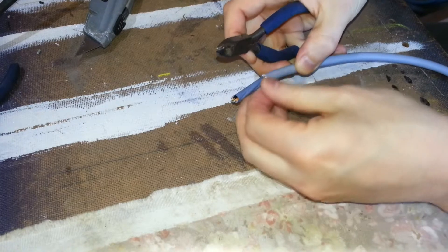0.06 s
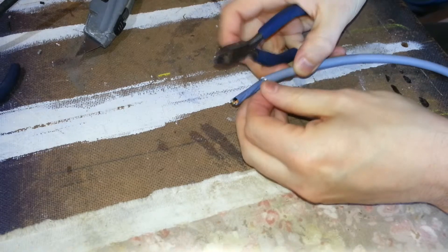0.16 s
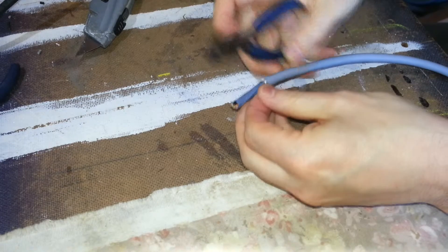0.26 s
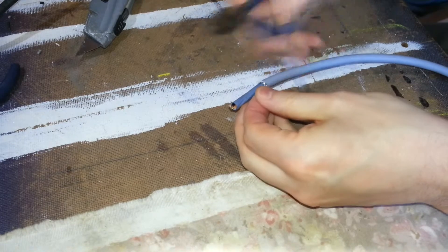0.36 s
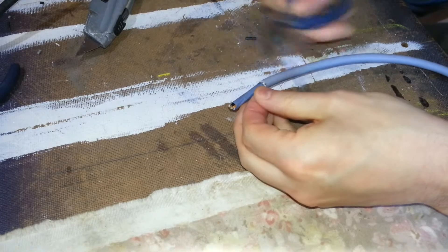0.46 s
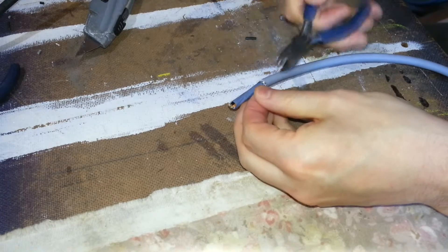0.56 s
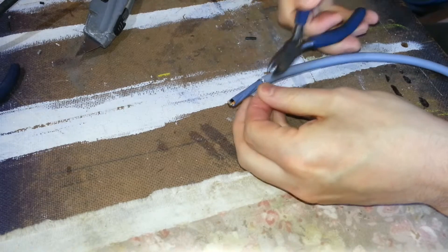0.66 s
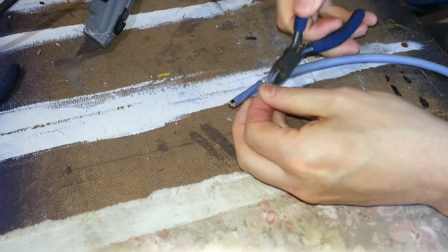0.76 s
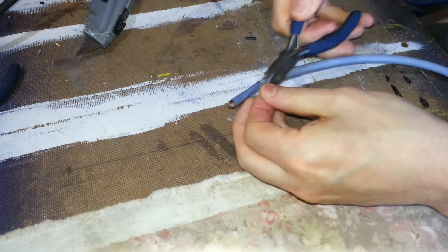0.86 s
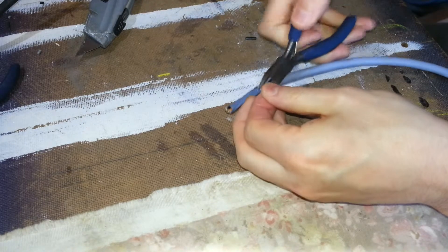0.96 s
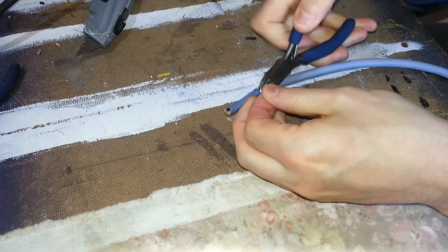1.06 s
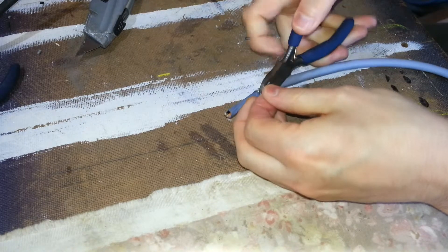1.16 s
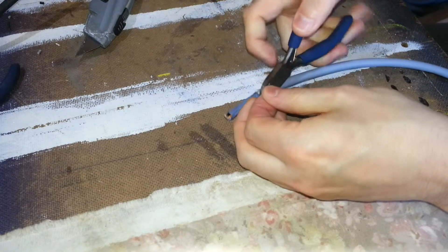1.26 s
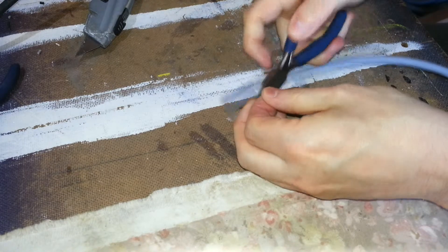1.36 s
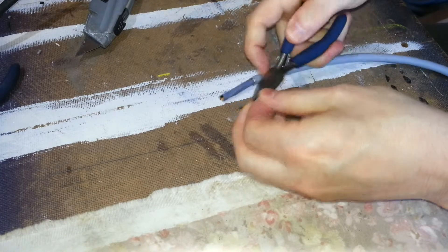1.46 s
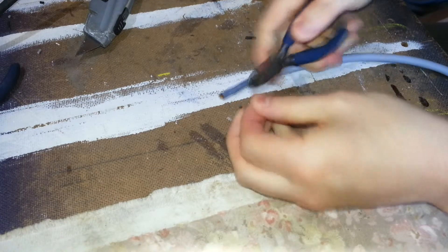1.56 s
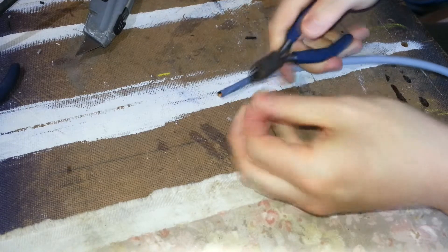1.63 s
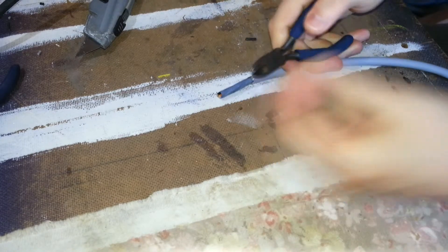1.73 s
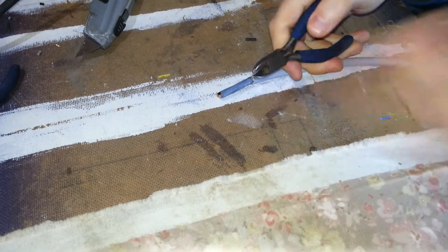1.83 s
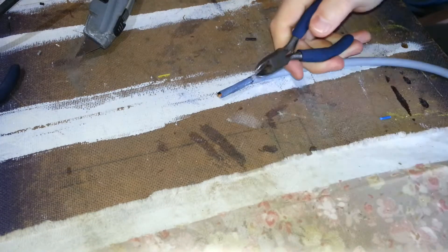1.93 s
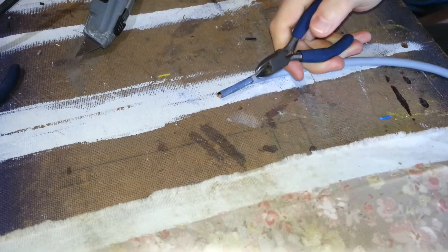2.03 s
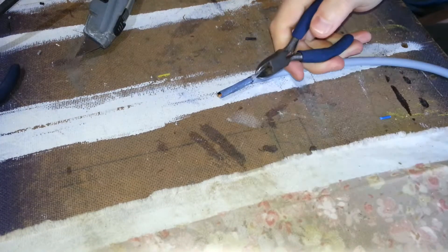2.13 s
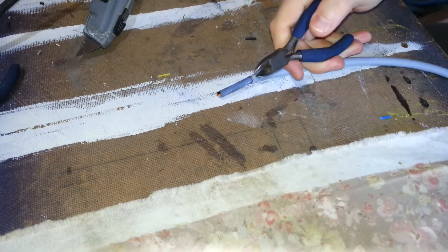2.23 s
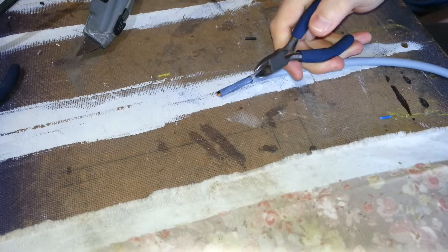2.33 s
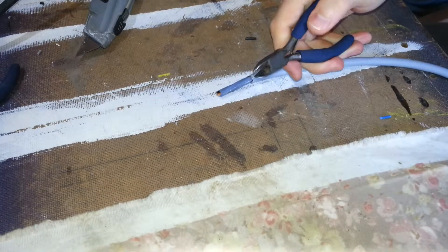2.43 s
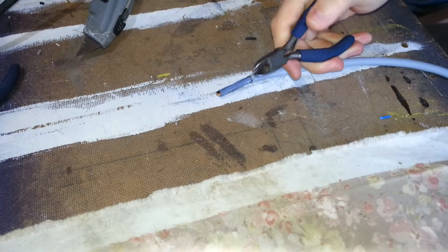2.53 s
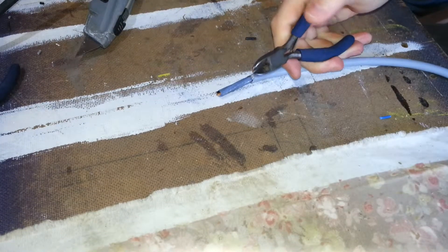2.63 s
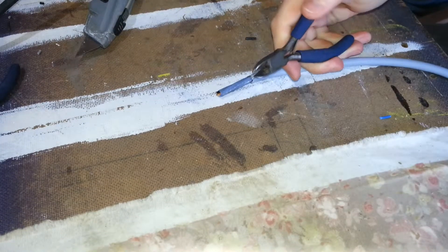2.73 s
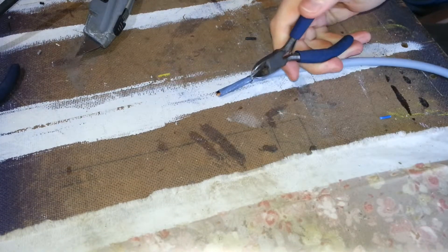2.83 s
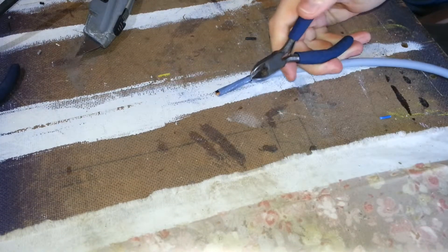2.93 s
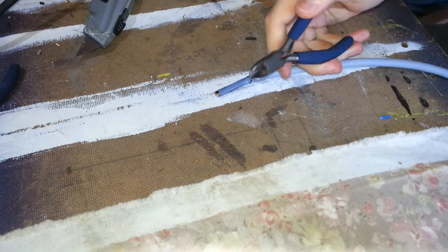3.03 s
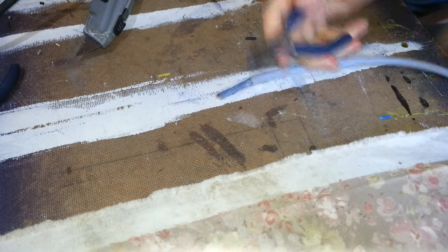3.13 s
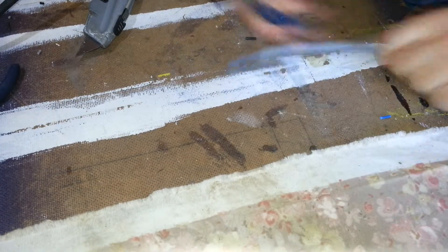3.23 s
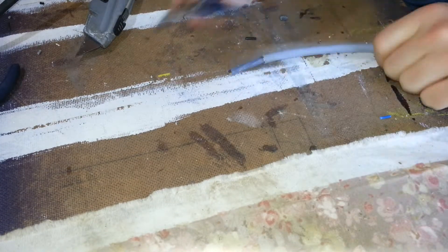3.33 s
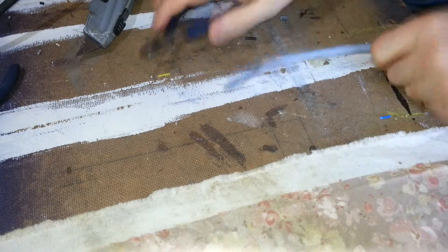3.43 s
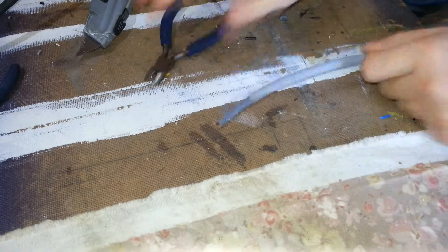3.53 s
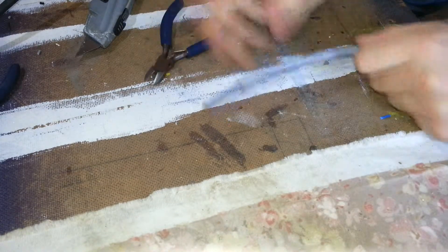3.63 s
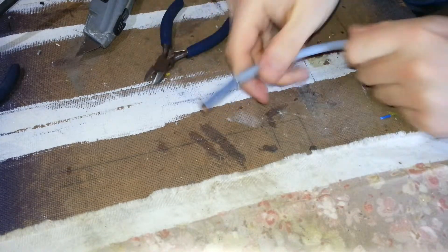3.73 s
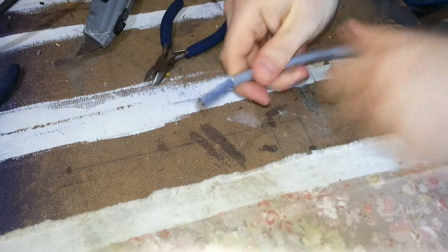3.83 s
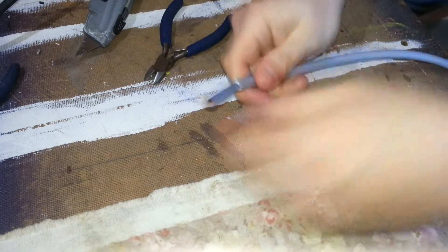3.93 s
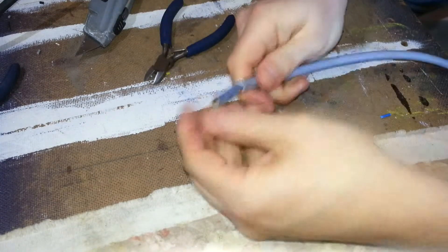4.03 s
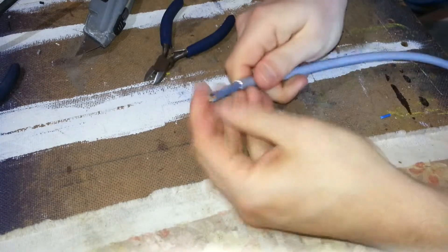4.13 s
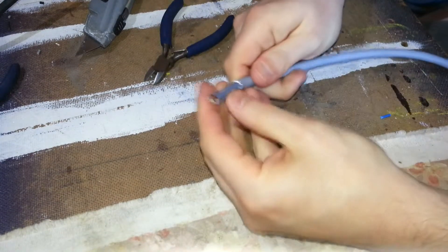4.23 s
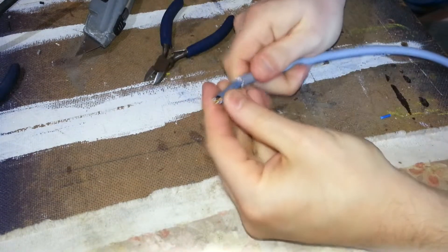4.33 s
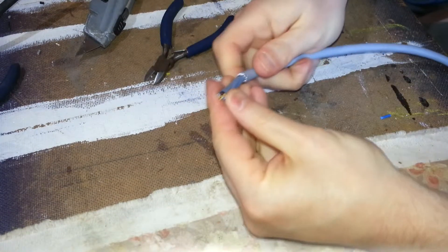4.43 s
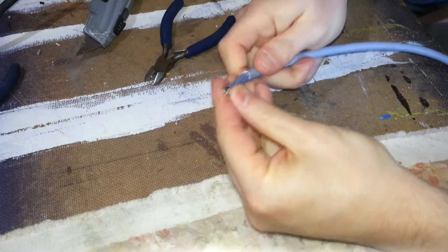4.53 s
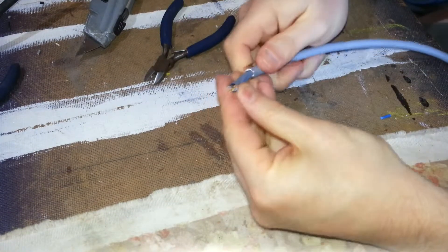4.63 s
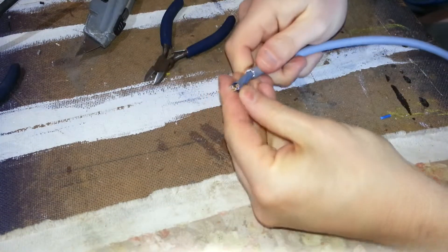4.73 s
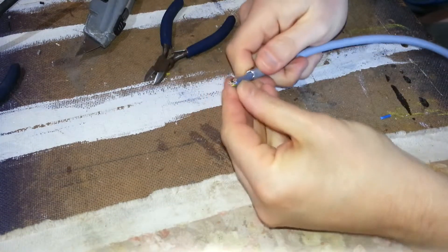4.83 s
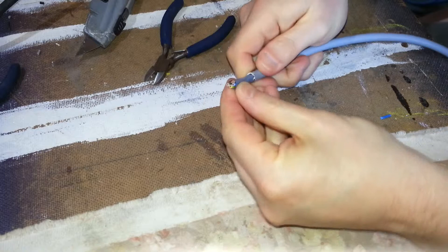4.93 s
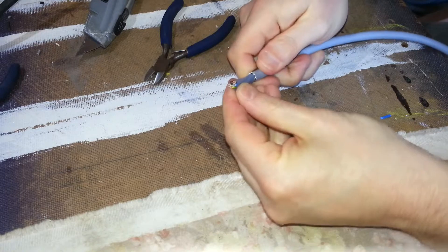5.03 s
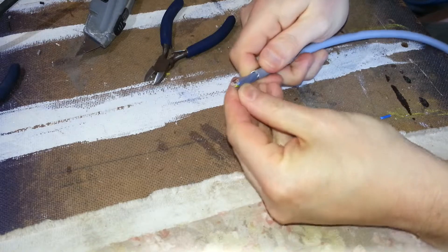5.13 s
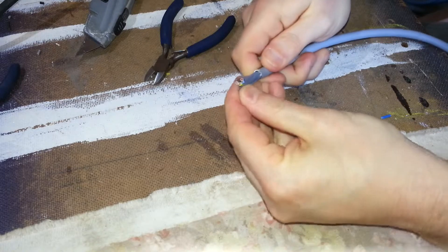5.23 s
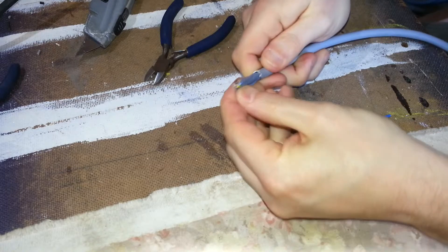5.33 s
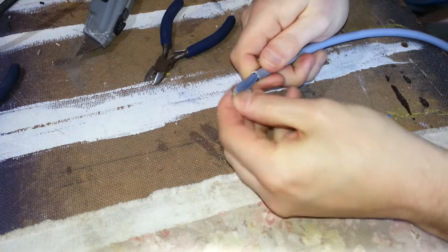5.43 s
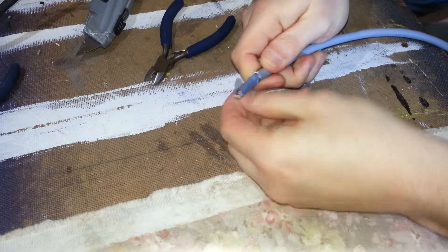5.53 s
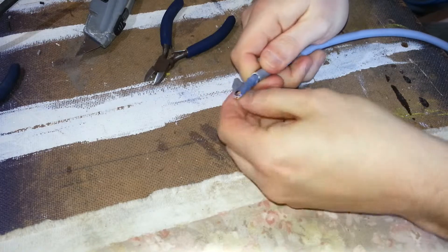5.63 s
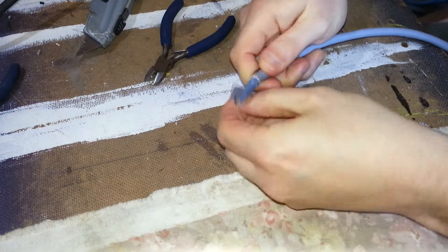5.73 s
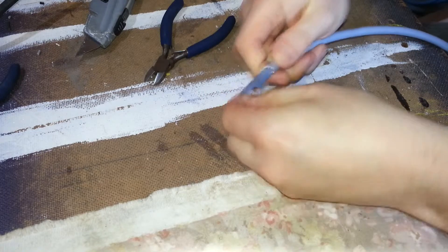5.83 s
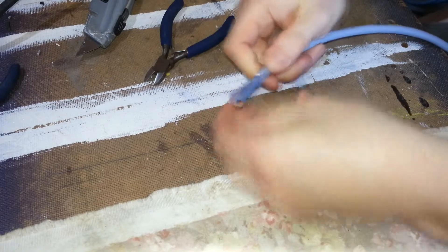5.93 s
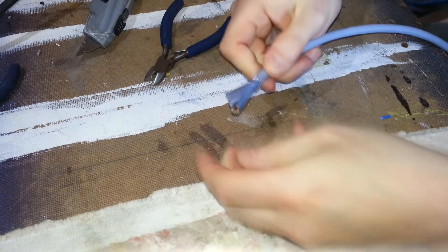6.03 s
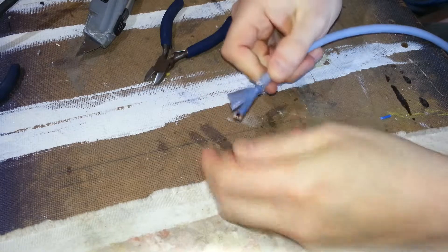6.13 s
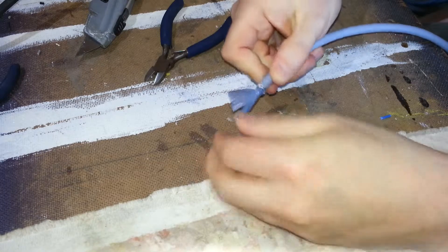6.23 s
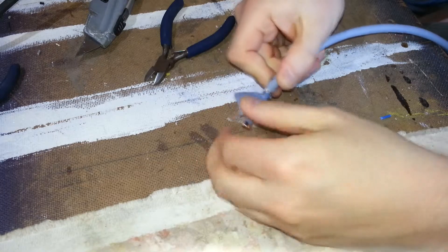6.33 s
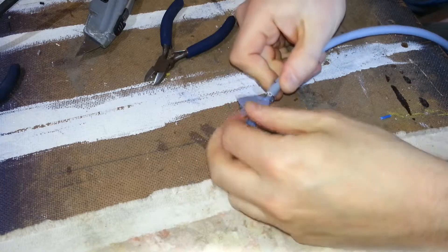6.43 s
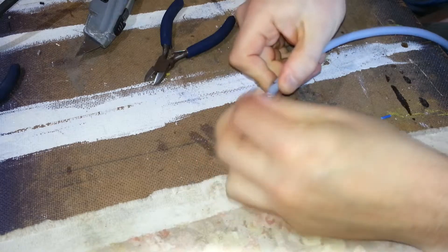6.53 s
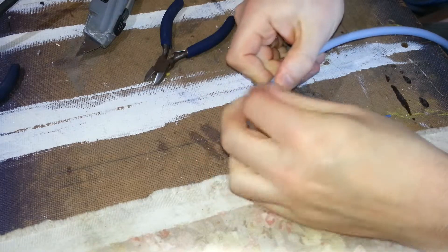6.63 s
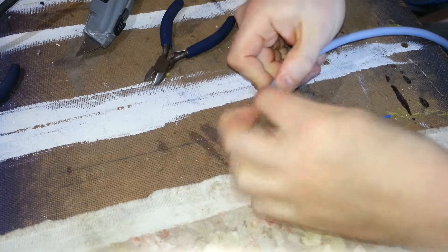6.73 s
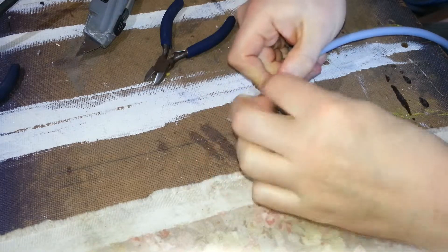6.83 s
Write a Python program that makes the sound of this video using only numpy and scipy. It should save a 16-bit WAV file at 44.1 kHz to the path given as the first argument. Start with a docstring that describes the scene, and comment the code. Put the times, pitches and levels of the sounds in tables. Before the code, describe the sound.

Small side cutters snip a cable and clatter onto a wooden workbench, then fingers peel back crackling foil shielding in a quiet room.

```python
"""Small side cutters snip a cable end with a steel click, and their dry pivot squeaks as they open.
The cable slaps and slides on a wooden workbench, shaking the board and ringing its modes; the cutters
are dropped on it, chatter and overload the microphone. Then fingers pick at the cable and peel back
its foil shield, which crackles in tiny slips and ticks as creases and wire strands let go.
A stereo pair close by, in a small, quiet room with a faint rumble and hiss."""
import sys
import numpy as np
from scipy import signal
from scipy.fft import rfft, irfft, next_fast_len
from scipy.io import wavfile
from scipy.ndimage import uniform_filter1d

SR = 44100
rng = np.random.default_rng(int(sys.argv[2]) if len(sys.argv) > 2 else 0)


def wav_record(signal):
    """Record a signal, one row per channel, as 16-bit PCM in the file named by sys.argv[1]."""
    frames = np.transpose(np.atleast_2d(signal))
    bounded = np.clip(frames, -1, 1)
    # unit amplitude maps onto the largest positive 16-bit level
    quanta = np.round(bounded * 32767).astype(np.int16)
    wavfile.write(sys.argv[1], SR, quanta)


N = 302878
TIME = np.arange(N) / SR
RING = TIME[:SR // 2]  # half a second for a short sound to die away

# Spectrum of the board's dense, quickly damped vibration. Each row: frequency in Hz, level in dB.
BOARD = [(30, -27), (70, -29), (130, -15.5), (200, -9.5), (290, -1), (420, -4), (700, -3), (1000, -1),
         (1380, 0.5), (1560, -6.5), (2200, -9), (3000, -11), (4200, -12.5), (7000, -17.5), (14000, -18.5)]
# Spectrum of the crackling foil. Each row: frequency in Hz, level in dB.
FOIL = [(60, -46), (250, -14), (600, -16), (900, -20), (1300, -29), (2400, -13), (3300, -9.5), (4400, -1.5),
        (6500, -13), (9500, -4.5), (14500, -16)]


def jaw_clacks(t60=.014):
    """Steel meets steel in a short, bright crack as the jaws bite, snap shut or are jolted."""
    # Each row: start in seconds, level in dB.
    clacks = [(1.337, -59), (1.3933, -32.5), (1.672, -56), (3.5016, -32)]
    # Spectrum of the steel. Each row: frequency in Hz, level in dB.
    steel = [(200, -21.5), (900, -4.5), (1600, 0), (2600, 0), (4200, -12.5), (7000, -15.5), (14000, -21.5)]
    out = np.zeros(N)
    for s, db in clacks:
        crack = colour(rng.standard_normal(len(RING)) * fade(t60), steel)
        add(out, s, undb(db) * burst(crack))
    return out


def pivot_squeaks(rise_hz_per_s=7100, waver_hz=190):
    """The dry pivot sticks and slips in short, raspy, rising chirps as the jaws open."""
    # Each row: start in seconds, length in seconds, level in dB, starting pitch in Hz.
    squeaks = [(1.931, 0.039, -50, 3200), (1.96, 0.038, -54, 3330), (2.042, 0.031, -58, 3420)]
    out = np.zeros(N)
    for s, length, db, start_hz in squeaks:
        t = RING[RING < length]
        waver = unit(uniform_filter1d(rng.standard_normal(len(RING)), size=30))[:len(t)]
        hz = start_hz + rise_hz_per_s * t + waver_hz * waver
        arch = np.sin(np.pi * t / length)
        add(out, s, undb(db) * arch * np.sin(2 * np.pi * np.cumsum(hz) / SR))
    return out


def cutter_drop(start_s=3.5171, db=-3.5, contact_hz=4000, ring_hz=1180, ring_db=-2.5):
    """Three rows of knocks: the cutters land flat and chatter, each rebound weaker and softer."""
    gap_s, step_db, softening = .0044, -4, .72
    return [(start_s + k * gap_s, db + k * step_db, contact_hz * softening ** k, ring_hz, ring_db)
            for k in range(3)]


def bench_knocks(board_t60=.025, tool_t60=.018, scatter=.11, modes_db=-6):
    """Tool and cable strike the board and its modes; a soft contact is duller; the tool rings briefly."""
    # Each row: start in seconds, level in dB, contact bandwidth in Hz, tool ring in Hz,
    # ring level in dB against the wood.
    blows = [(0.872, -52, 900, 536, -1), (1.3959, -24, 3330, 1267, 1.5), (1.413, -32.5, 3000, 1360, -4),
             (3.104, -48.5, 2250, 1298, -0.5), (3.2443, -26, 2000, 371.7, 1),
             (3.432, -31.5, 2000, 1140, 5.5), (3.4996, -15.5, 1497, 1117, 5),
             (3.637, -23.5, 1894, 1180, -10)]
    out, modes = np.zeros((2, N)), bench_modes()
    for s, db, contact_hz, ring_hz, ring_db in blows + cutter_drop():
        # bending waves spread through the wide board, which radiates a little differently to each capsule
        push = scatter * diffuse(len(RING), split_hz=700) * fade(board_t60)
        push[:, 0] = -1  # the impact itself
        board = burst(np.array([colour(side, BOARD) for side in push]))
        wood = burst(lowpass(board + undb(modes_db) * modes, contact_hz, order=2))
        tool = undb(ring_db) * burst(mode(ring_hz, tool_t60))
        add(out, s, undb(db) * burst(wood + tool))
    return out


def bench_bumps(t60=.05, soft_hz=520):
    """Soft, heavy contacts of hand, tool and cable move only the lowest part of the board's range."""
    # Each row: start in seconds, level in dB, pitch in Hz.
    bumps = [(1.3979, -32, 305), (1.57, -47, 336), (2.126, -41.5, 337), (2.133, -45.5, 91),
             (2.145, -46.5, 452), (2.155, -39, 175), (2.179, -39.5, 220), (3.517, -26, 55),
             (3.544, -29, 150)]
    out = np.zeros(N)
    for s, db, hz in bumps:
        thud = np.diff(mode(hz, t60), prepend=0)  # pressure follows the change of the board's speed
        add(out, s, undb(db) * burst(lowpass(thud, soft_hz, order=2)))
    return out


def bench_slides(modes_db=-8, soft_hz=1900):
    """Cable and tool slide on the bench, feeding the board and its modes with dense slips."""
    # Each row: peak time in seconds, level in dB, rise and fall in seconds.
    slides = [(3.15, -60, 0.12, .16), (3.31, -40, 0.067, 0.053), (3.425, -33.5, .025, 0.042),
              (3.58, -31, .05, .08)]
    friction = slips(per_s=2300, spread_db=3)
    board = unit(colour(friction, BOARD))
    ringing = unit(signal.fftconvolve(friction, bench_modes())[:N])
    return unit(lowpass(board + undb(modes_db) * ringing, soft_hz, order=1)) * strokes(slides)


def bench_modes():
    """The lasting ring of the bench top: damped modes, each with a random sign."""
    # Each row: frequency in Hz, level in dB, seconds to fall by 60 dB.
    modes = [(142, -9.5, .3), (253.4, -3.5, 0.054), (324.5, 8, 0.14), (435, -11.5, 0.081), (633.8, 1, 0.11),
             (784, -4, 0.3), (1028, -5, .11), (1118, -11, .15), (1280, -4.5, 0.13), (1412, -3, 0.044),
             (1818, -10, 0.0816), (2063, -9.5, 0.063), (2300, -17, .07)]
    return burst(sum(rng.choice([-1, 1]) * undb(db) * mode(hz, t60) for hz, db, t60 in modes))


def foil_snaps(cycles=7, overtone_ratio=1.46, overtone_db=-5, chatter_gain=.14, shiver_gain=.092):
    """A strand or crease lets go: two heavily damped modes chatter briefly while the foil shivers."""
    # Each row: start in seconds, peak of the click in dB, pitch in Hz.
    snaps = [(4.162, -21, 5940), (4.3423, -26, 4850), (4.3846, -30, 4800), (4.524, -32.5, 4210),
             (4.704, -31, 5150), (4.7946, -25, 4780), (5.137, -31, 5200), (5.2005, -27.5, 5520),
             (5.411, -33, 7000), (5.5165, -12.5, 3320), (5.5274, -6.5, 4740), (5.5406, 0, 4800),
             (5.5439, -4.5, 4600), (5.5504, -8.5, 5200), (5.683, -17, 6660), (5.691, -20, 4630),
             (5.778, -10, 6500), (5.7861, -13, 4200), (5.8095, -8, 3500), (6.184, -29, 2500),
             (6.2188, -22.5, 6200), (6.457, -21.5, 2040), (6.484, -20.5, 3040), (6.498, -16, 2010),
             (6.52, -17.5, 2600), (6.5314, -12, 2970), (6.556, -12.5, 2130), (6.5844, -11, 7000),
             (6.650, -9.5, 3770), (6.794, -18, 5540), (6.8308, -21, 5000)]
    out = np.zeros(N)
    for s, db, hz in snaps:
        t60 = cycles / hz
        overtone = undb(overtone_db) * mode(overtone_ratio * hz, t60 / overtone_ratio)
        click = np.diff(mode(hz, t60) + overtone, prepend=0)
        click /= np.abs(click).max()
        rattle, crinkle = rng.standard_normal((2, len(RING)))
        chatter = unit(signal.fftconvolve(rattle, click)[:len(RING)]) * fade(t60=.019)
        shiver = unit(colour(crinkle, FOIL)) * fade(t60=.02)
        add(out, s, undb(db) * (click + chatter_gain * chatter + shiver_gain * shiver))
    return out


def foil_rustle(fine_db=-4.5, creases_db=-7):
    """Rubbed foil crackles finely and small creases tick; larger folds add a lower crumple."""
    # Finger strokes. Each row: peak time in seconds, level in dB, rise and fall in seconds,
    # crumple in dB against that level.
    rubs = [(4.155, -52.5, 0.055, 0.043, -8.5), (4.42, -63.5, 0.11, 0.28, 3), (4.82, -55.5, .1, 0.21, -9.5),
            (5.22, -58, 0.12, 0.23, -7.5), (5.475, -49, .11, 0.052, -18),
            (5.544, -27.5, 0.038, 0.03, -16.5), (5.73, -38.5, 0.049, 0.056, -28.5),
            (5.798, -28, 0.035, 0.038, -13), (5.98, -56, 0.071, .17, -1.5),
            (6.505, -53.5, 0.13, 0.041, 3.5), (6.648, -32, 0.079, 0.088, -20),
            (6.812, -44.5, 0.032, 0.029, -8.5)]
    # Spectrum of the larger folds. Each row: frequency in Hz, level in dB.
    crumple = [(50, -56), (150, -17.5), (300, -2), (850, -10), (1400, 2), (2300, -5), (3500, -2.5),
               (7000, -19.5)]
    rubbing = strokes(row[:-1] for row in rubs)
    folding = strokes((s, db + crumple_db, rise, fall) for s, db, rise, fall, crumple_db in rubs)
    fine = unit(colour(slips(per_s=2200, spread_db=6), FOIL))
    creases = unit(colour(slips(per_s=90, spread_db=2.5), FOIL))
    folds = unit(colour(slips(per_s=1800, spread_db=5.5), crumple))
    return rubbing * (undb(fine_db) * fine + undb(creases_db) * creases) + folding * folds


def skin_brushes():
    """Hands slide softly over the cable jacket in dense, even slips."""
    # Each row: peak time in seconds, level in dB, rise and fall in seconds.
    brushes = [(.44, -58, 0.065, 0.04), (1.79, -56, 0.36, 0.14), (3.258, -49.5, .02, .13),
               (3.43, -55, .05, 0.2)]
    # Spectrum of skin on the jacket. Each row: frequency in Hz, level in dB.
    skin = [(60, -18.5), (250, 4), (1000, -1.5), (2000, -2), (4200, -0.5), (7000, -8), (14000, -7.5)]
    return unit(colour(slips(per_s=2000, spread_db=.5), skin)) * strokes(brushes)


def room_response(early_db=-3, early_t60=.07, onset_s=.0015):
    """Dense reflections from things near the pair, then a tail that loses its top treble first."""
    # Decay of the tail. Each row: frequency in Hz, seconds to fall by 60 dB.
    tail_t60 = [(100, 0.38), (500, 0.38), (1200, 0.32), (3000, .37), (6000, 0.33), (14000, .18)]
    # Spectrum of the reflections. Each row: frequency in Hz, level in dB.
    room_colour = [(40, -15.5), (120, -1), (250, -0.5), (1200, 0), (3000, -3.5), (7000, -5), (14000, 3)]
    hz, s, cells = signal.stft(diffuse(len(RING), split_hz=480), SR, nperseg=256)
    tail = np.exp(-np.log(1000) * s / across(tail_t60, hz)[:, None])
    early = undb(early_db) * np.exp(-np.log(1000) * s / early_t60)
    onset = np.minimum(RING / onset_s, 1) ** 2
    echoes = signal.istft(cells * (tail + early), SR)[1][:, :len(RING)] * onset
    return [colour(side / np.sqrt(np.sum(side ** 2)), room_colour) for side in echoes]


def room_tone(db=-55):
    """Steady rumble and hiss reach the pair from all sides."""
    # Spectrum of the quiet room. Each row: frequency in Hz, level in dB.
    air = [(15, -55), (25, -37), (108, -5.5), (216, -6.5), (247, -6.5), (290, -9.5), (340, -8.5),
           (368, -10.5), (579, -13.5), (627, -14), (1250, -17), (2020, -21.5), (2250, -20.5), (6020, -27),
           (14500, -26)]
    noise = diffuse(next_fast_len(N, True), split_hz=75)
    return undb(db) * unit(np.array([colour(side[:N], air) for side in noise]))


def place(x, walls, wet_db, pan_db, lag_ms):
    """Direct sound, pan_db louder at the left capsule and lag_ms later at the right, plus the room."""
    left, right = np.broadcast_to(x, (2, N))
    size = next_fast_len(N, True)
    delay = np.exp(-2j * np.pi * np.fft.rfftfreq(size, 1 / SR) * lag_ms / 1000)
    delayed = irfft(rfft(right, size) * delay, size)[:N]
    direct = np.array([left * undb(pan_db / 2), delayed * undb(-pan_db / 2)])
    return direct + undb(wet_db) * np.array([signal.fftconvolve(left, side)[:N] for side in walls])


def diffuse(size, split_hz):
    """Noise from all sides: alike at both capsules in the bass, unrelated well above split_hz."""
    hz = np.fft.rfftfreq(size, 1 / SR)
    alike = .95 / (1 + (hz / split_hz) ** 2)
    mid, side = rfft(rng.standard_normal((2, size)))
    mid, side = mid * np.sqrt(1 + alike), side * np.sqrt(1 - alike)
    return irfft(np.array([mid + side, mid - side]), size) / np.sqrt(2)


def slips(per_s, spread_db):
    """Tiny stick-slip releases at random moments; a wide spread makes a few much larger."""
    size = undb(spread_db * np.minimum(rng.exponential(size=N), 4))
    return (rng.random(N) < per_s / SR) * rng.choice([-1, 1], N) * size


def strokes(rows):
    """Summed gain of strokes: bells 20 dB down rise seconds before the peak and fall seconds after."""
    gain = np.zeros(N)
    for s, db, rise, fall in rows:
        away = (TIME - s) / np.where(TIME < s, rise, fall)
        gain += undb(db - 20 * np.minimum(away ** 2, 10))
    return gain


def mode(hz, t60):
    """One damped vibration."""
    return np.sin(2 * np.pi * hz * RING) * fade(t60)


def fade(t60):
    """Exponential decay that loses 60 dB in t60 seconds."""
    return np.exp(-np.log(1000) * RING / t60)


def colour(x, points):
    """Minimum-phase filter with the given (Hz, dB) response."""
    size = 4096
    gain = undb(across(points, np.fft.rfftfreq(size, 1 / SR)))
    cepstrum = irfft(np.log(gain))
    cepstrum[1:size // 2] *= 2
    cepstrum[size // 2:] = 0
    return signal.fftconvolve(x, irfft(np.exp(rfft(cepstrum))))[:len(x)]


def across(points, hz):
    """Read (Hz, value) points on a log-frequency axis."""
    f, value = np.transpose(points)
    return np.interp(np.log(hz + 1), np.log(f), value)


def lowpass(x, hz, order):
    """Dull a sound above hz."""
    return signal.lfilter(*signal.butter(order, hz, fs=SR), x)


def undb(db):
    """Decibels to gain."""
    return np.exp(np.asarray(db) * np.log(10) / 20)


def unit(x):
    """Scale to rms 1."""
    return x / np.sqrt(np.mean(x ** 2))


def burst(x):
    """Scale a short sound to the energy of 10 ms at rms 1."""
    return unit(x) * np.sqrt(SR / 100 / x.shape[-1])


def add(track, s, sound):
    """Mix a sound in at s seconds."""
    i = int(s * SR)
    track[..., i:i + sound.shape[-1]] += sound[..., :N - i]


def scene():
    """Bench and hands close to the pair and near its centre, over the room tone."""
    walls = room_response()
    bench = bench_knocks() + bench_bumps() + bench_slides() + jaw_clacks()
    hands = foil_snaps() + foil_rustle() + skin_brushes() + pivot_squeaks()
    return (place(bench, walls, wet_db=-1, pan_db=.6, lag_ms=.038)
            + place(hands, walls, wet_db=0, pan_db=1.4, lag_ms=-.032)
            + room_tone())


def record(dry):
    """The recorder sheds the deepest bass, flattens the loudest peaks and cuts the top."""
    bottom_hz, top_hz, hardness = 18, 14800, 12
    sound = signal.lfilter(*signal.butter(1, bottom_hz, "high", fs=SR), dry)
    clipped = sound / (1 + sound ** hardness) ** (1 / hardness)
    return signal.sosfilt(signal.ellip(8, .1, 60, top_hz, fs=SR, output="sos"), clipped)


dry = scene()
out = record(dry)
wav_record(out)
```